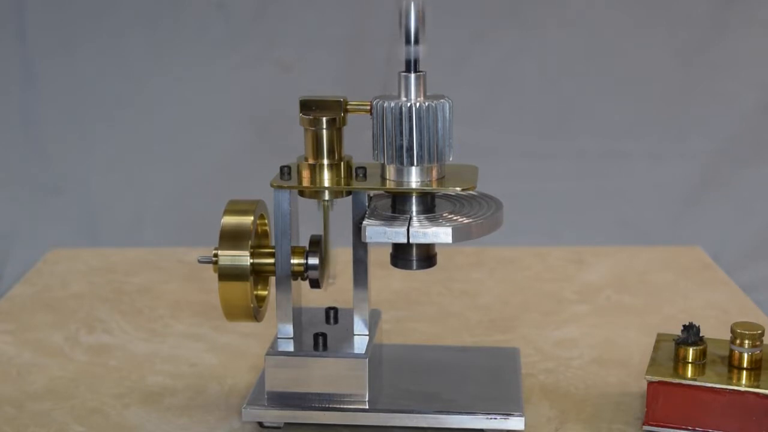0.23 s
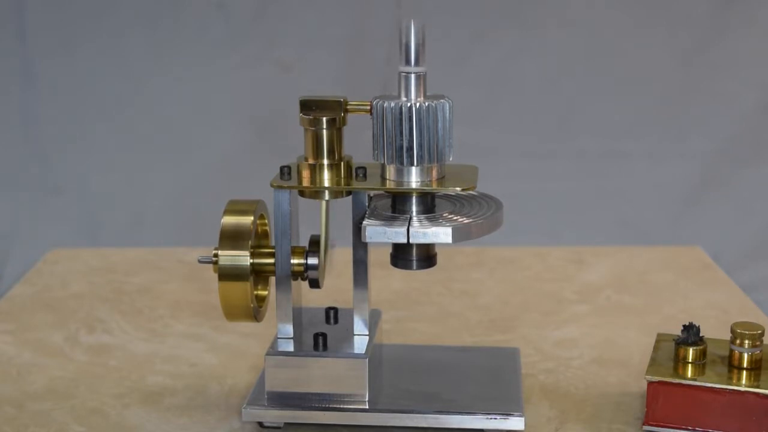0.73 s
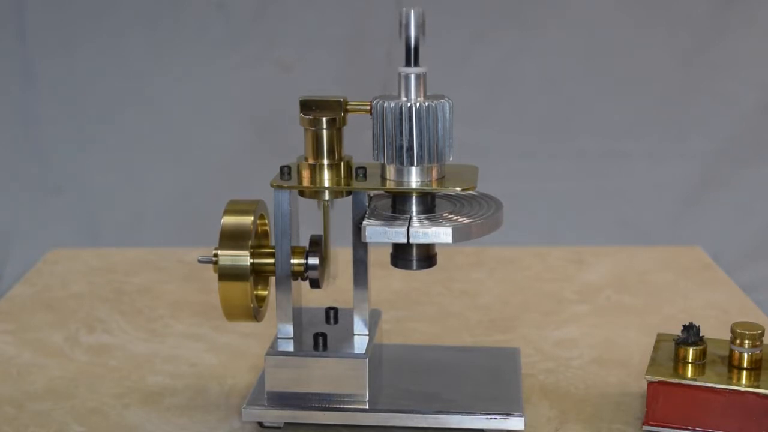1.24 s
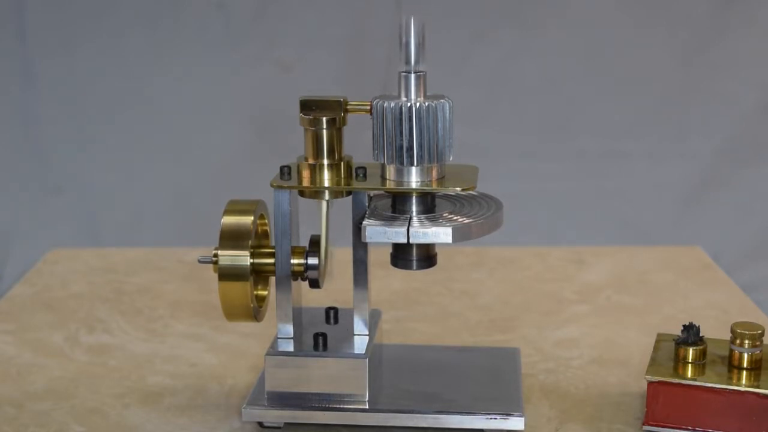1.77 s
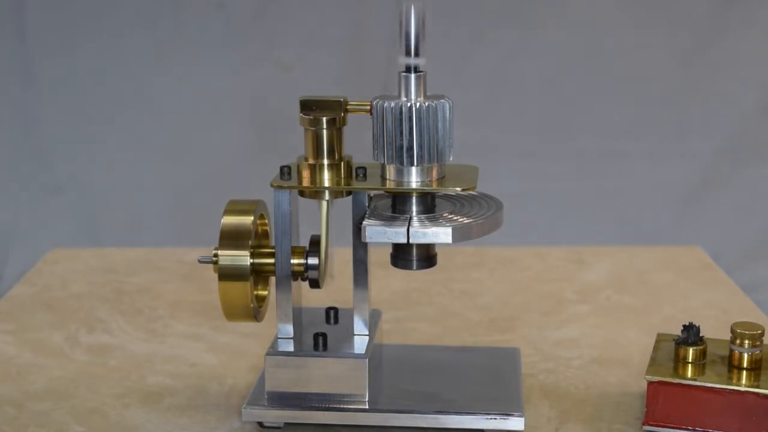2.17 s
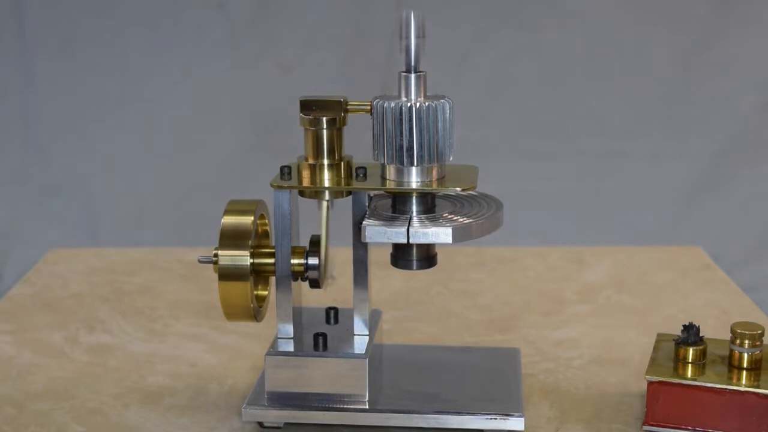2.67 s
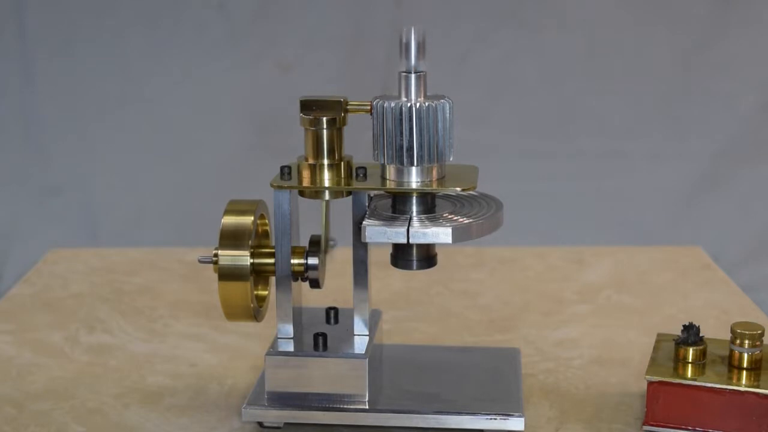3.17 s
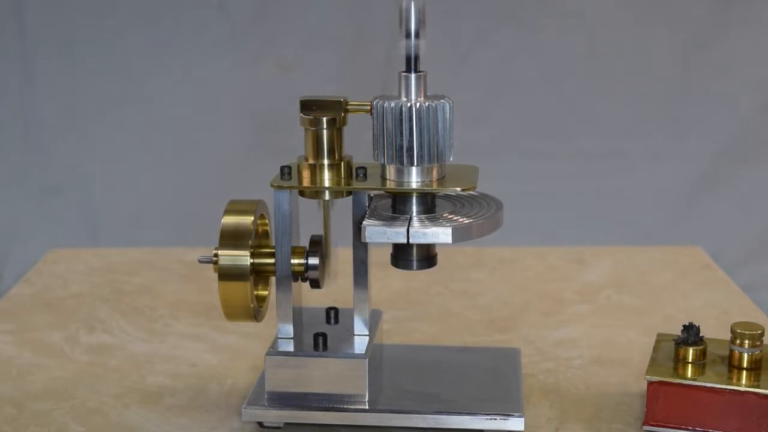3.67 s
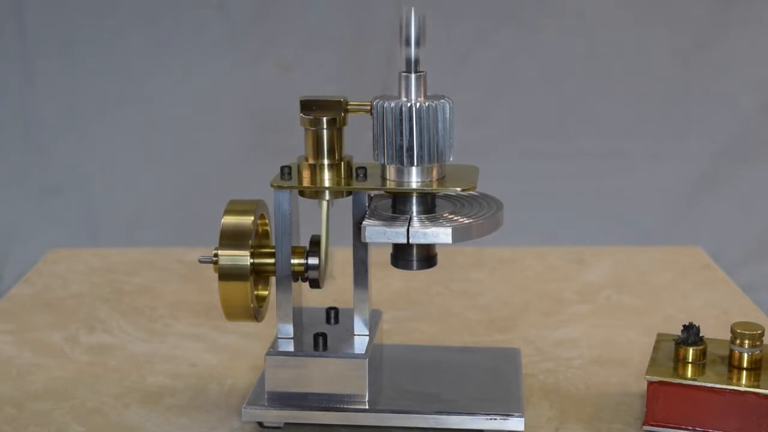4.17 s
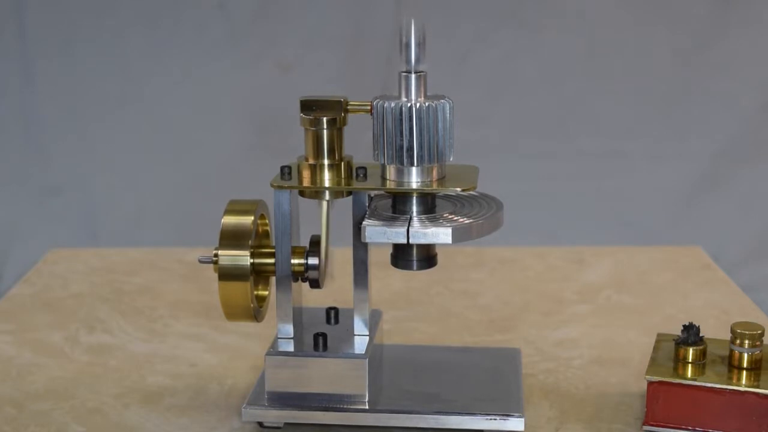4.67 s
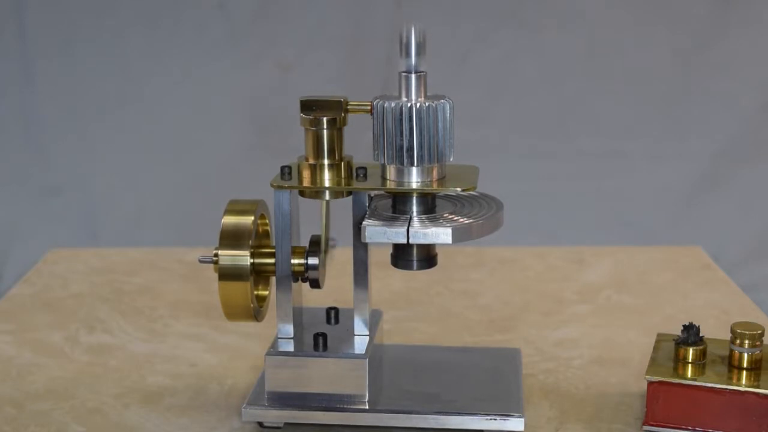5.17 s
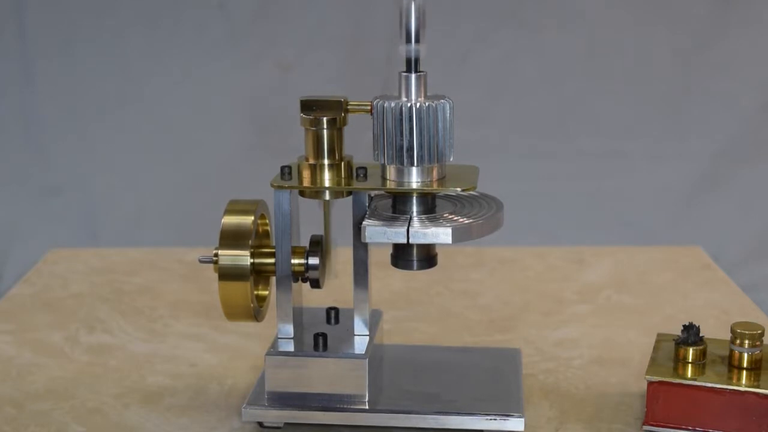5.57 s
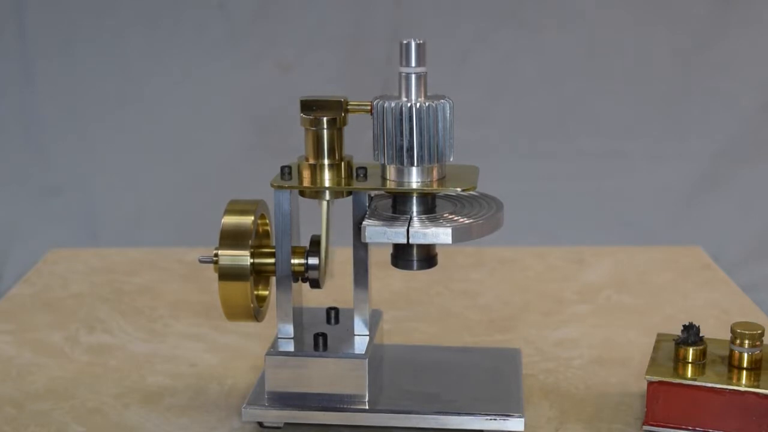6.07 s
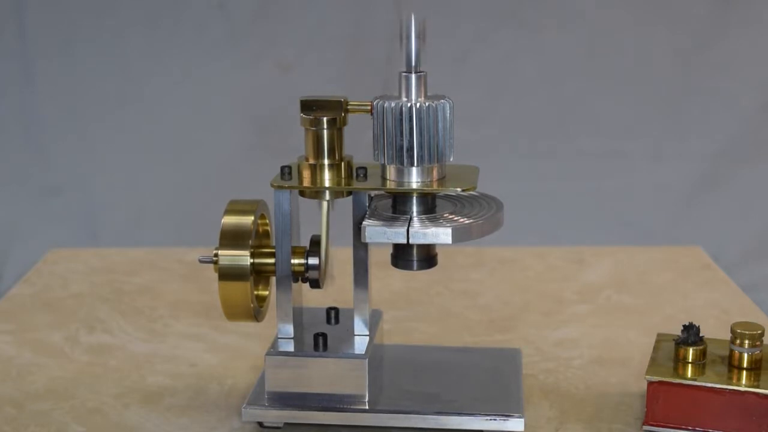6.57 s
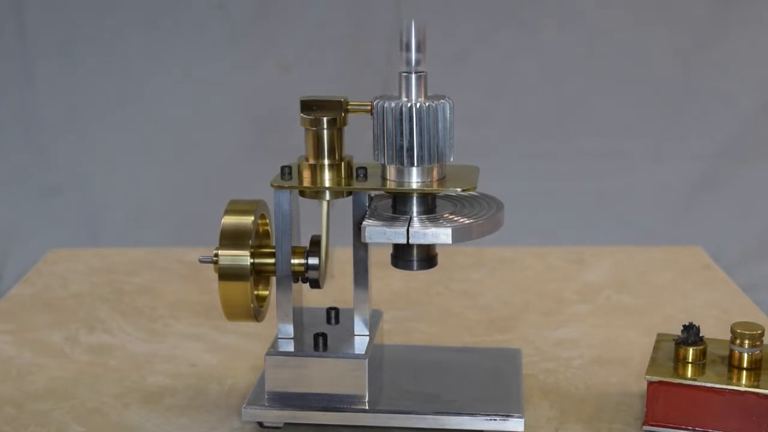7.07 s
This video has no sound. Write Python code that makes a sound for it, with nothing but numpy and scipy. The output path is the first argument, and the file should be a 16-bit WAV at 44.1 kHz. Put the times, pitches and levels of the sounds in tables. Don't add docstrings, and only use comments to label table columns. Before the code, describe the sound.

A small metal hot-air engine runs on a wooden table, its loose piston striking a stop twice each turn: a sharp bright tap, then a duller knock, around twenty pairs a second. The rattle falters several times, leaving short gaps with faint dry ticks, then resumes. Close mono microphone, small room, soft low hum and air noise beneath.

```python
import sys
import numpy as np
from scipy import signal
from scipy.fft import rfft, irfft, next_fast_len
from scipy.io import wavfile

SR = 44100
rng = np.random.default_rng(int(sys.argv[2]) if len(sys.argv) > 2 else 0)


def wrap_up_sound(samples):
    columns = np.atleast_2d(samples).T
    tamed = np.clip(columns, -1, 1)
    steps = np.round(tamed * 32767).astype(np.int16)
    wavfile.write(sys.argv[1], SR, steps)


def undo_db(level):
    steps = np.asarray(level, float) / 20
    return 10 ** steps


N = 322371
RING = SR // 5


def unit(x):
    return x / np.sqrt(np.mean(x ** 2) + 1e-20)


def along(points, hz):
    f, v = np.transpose(points)
    return np.interp(np.log(hz + 1), np.log(f + 1), v)


def filtered(x, response):
    n = x.shape[-1]
    m = next_fast_len(n + 8192)
    return irfft(rfft(x, m) * response(np.fft.rfftfreq(m, 1 / SR)), m)[..., :n]


# (frequency [Hz], density [dB per Hz])
AIR_NOISE = [(25, -47), (60, -8.5), (110, -13.5), (200, -13.5), (300, -16.5), (480, -5), (700, -17),
             (950, -17.5), (2000, -31), (4000, -28), (7000, -35), (10000, -40), (16000, -43)]
# (frequency [Hz], width [Hz], level [dB])
HUM_LINES = [(120.5, 3.1, -53.5), (145.6, 4.8, -52), (161, 6.3, -53.5)]


def room_tone():
    air_db = -44.5
    air = filtered(rng.standard_normal(N), lambda hz: undo_db(along(AIR_NOISE, hz)))
    tone = undo_db(air_db) * unit(air)
    for center_hz, width_hz, db in HUM_LINES:
        line = filtered(rng.standard_normal(N), lambda hz: 1 / (1 + (2 * (hz - center_hz) / width_hz) ** 2))
        tone += undo_db(db) * unit(line)
    return tone


# (first [s], last [s], reach at first [dB], reach at last [dB])
STEADY_SPELLS = [(.0031, .3865, 0, -1), (0.4346, .4352, -5, -4.5), (0.5752, .5755, -6, -6),
                 (0.6232, .8625, -.5, -1.5), (0.9074, 1.103, -0.5, -6), (1.5436, 1.5438, -2.5, -2.5),
                 (1.5923, 1.6961, 0, -1), (1.7525, 1.8032, -6.5, -4), (1.8506, 2.2011, -0.5, 0.5),
                 (2.407, 2.407, -3, -7), (2.4529, 2.9036, .5, .5), (2.951, 3.1944, .5, 0),
                 (3.2472, 3.2475, -4, -5.5), (3.391, 3.3908, -1.5, -1), (3.4367, 3.6796, 1, .5),
                 (3.7265, 4.0152, .5, -1), (4.4032, 4.4515, 0.9, 1), (4.5063, 4.6566, -1, -1),
                 (4.7052, 5.147, 0, 0), (5.1982, 5.3918, -1.8, -0.5), (5.4376, 5.5364, .5, -0.5),
                 (5.5824, 5.965, 0, -0.5), (6.0172, 6.0169, -8, -8), (6.4046, 6.5027, -.5, 1),
                 (6.5536, 6.654, 0.2, .7), (6.708, 6.9055, -0.1, 0.6), (6.957, 7.3041, -0.1, 0.5)]
# (time [s], blow [dB], hardness [dB])
STRAY_TOP = [
    (-.046, -35, -8),
    (1.2446, -30.5, 0.5),
    (3.3345, -29, 1.5),
    (4.102, -27.5, -0.5),
    (4.259, -32, -8),
    (4.3486, -29, 3),
    (6.258, -29, -4),
]
# (time [s], blow [dB])
STRAY_BOTTOM = [(-.021, -15), (.4634, -31.5), (0.5085, -30), (1.133, -36.5), (1.1594, -29), (1.2164, -27),
                (1.271, -29.5), (1.4747, -33), (1.5187, -27), (2.2328, -28), (2.2863, -30), (2.3367, -32.5),
                (2.382, -27), (3.2739, -29), (3.3686, -26), (4.0435, -29.5), (4.1411, -30.5), (4.1916, -34),
                (4.2273, -27), (4.2865, -29), (4.3808, -24.5), (6.045, -34.5), (6.0803, -26.5),
                (6.1652, -29.5), (6.2329, -28.5), (6.2852, -28), (6.3761, -25.5)]


def piston():
    turn_s, down_share = 0.049, 0.535
    top_db, top_hard_db, hard_per_reach = -25.5, 1.4, 0.68
    bottom_db, bottom_hard_db, bottom_reach = -25, -3, 0.53
    top_slop_s, slop_s, soft_db_per_slop = 0.0005, 0.0008, 1.7
    blow_scatter_db, hard_scatter_db = 0.5, 0.65

    spells = []
    for first_s, last_s, first_db, last_db in STEADY_SPELLS:
        count = round((last_s - first_s) / turn_s) + 1
        spells.append(np.linspace((first_s, first_db), (last_s, last_db), count))
    s, reach_db = np.concatenate(spells).T
    chance = rng.standard_normal((len(s), 5))

    top_s = s + top_slop_s * chance[:, 0]
    top_blow_db = top_db + reach_db + blow_scatter_db * chance[:, 1]
    hard_scatter = hard_scatter_db * (chance[:, 2] - chance[:, 1])
    top = np.c_[top_s, top_blow_db, top_hard_db + hard_per_reach * reach_db + hard_scatter]

    gap_s = np.diff(s)
    slop = np.diff(chance[:, 3])
    mean_reach_db = (reach_db[1:] + reach_db[:-1]) / 2
    bottom_s = s[:-1] + down_share * gap_s + slop_s * slop
    bottom_blow_db = bottom_db + bottom_reach * mean_reach_db + blow_scatter_db * chance[1:, 4]
    bottom_hardness_db = bottom_hard_db - soft_db_per_slop * np.maximum(slop, -1)
    bottom = np.c_[bottom_s, bottom_blow_db, bottom_hardness_db]
    bottom = bottom[gap_s < 1.3 * turn_s]
    stray_bottom = [(t, db, bottom_hard_db) for t, db in STRAY_BOTTOM]
    return np.r_[top, STRAY_TOP], np.r_[bottom, stray_bottom]


# (frequency [Hz], gain [dB])
HEARD_GAIN = [(310, 5.5), (400, 3.5), (500, 1), (2400, 1.5), (3200, 0), (3800, 0), (4400, 1.5), (5900, 1.5)]


def modes(table, column, rise_cycles):
    held = 0.91
    hz, t60, swing = np.transpose(table)[[0, 1, column], :, None]
    t = np.arange(RING) / SR
    decay = undo_db(along(HEARD_GAIN, hz) - 60 * t / (held * t60))
    rise = 1 - np.exp(-t * hz / rise_cycles)
    return swing * decay * rise * np.sin(2 * np.pi * hz * t)


def causal(points):
    hz = np.fft.rfftfreq(2048, 1 / SR)
    cepstrum = irfft(np.log(undo_db(along(points, hz))))
    folded = np.r_[cepstrum[0], 2 * cepstrum[1:1024], np.zeros(1024)]
    pulse = irfft(np.exp(rfft(folded)))[:512]
    return pulse / np.abs(pulse).max()


def placed(s, sounds):
    at = np.round(s * SR).astype(int) + np.arange(RING) + RING
    return np.bincount(at.ravel(), sounds.ravel(), N + 2 * RING)[RING:N + RING]


# (frequency [Hz], t60 [s], swing from top blow, swing from bottom blow)
TABLE_MODES = [(298, 0.068, 0.15, -0.85), (397, 0.074, 1.08, -0.6), (467, 0.039, -1.44, 0.26),
               (531, 0.041, -1.18, 0.14), (643, 0.124, -0.16, -0.65), (691, 0.055, 0.61, 1.4),
               (895, 0.042, 0.32, -1.0)]
PLATE_MODES = [(1124, 0.042, 0.87, -1.51), (1224, 0.067, 0.58, -1.15), (1250, 0.045, 2.31, -0.79),
               (1283, 0.105, -0.29, 0.57), (1585, 0.071, 0.24, -0.4), (1649, 0.2, 0.13, -0.15),
               (1756, 0.2, -0.11, 0.15), (1878, 0.011, -0.47, 0.76), (1914, 0.2, -0.12, 0.22),
               (2028, 0.032, -0.57, 2.02), (2194, 0.05, -0.18, 0.37), (2273, 0.2, -0.16, 0.24),
               (2337, 0.034, -0.7, 0.99), (2535, 0.113, -0.21, 0.12)]
FRAME_MODES = [(3077, 0.085, -0.09, -0.21), (3210, 0.003, -6.27, 6.6), (3436, 0.006, 0.61, -2.44),
               (3716, 0.059, 0.63, -0.47), (3802, 0.012, 2.25, -0.48), (3848, 0.2, 0.3, -0.35),
               (3965, 0.118, 0.62, -0.62), (4151, 0.009, 2.6, -5.09), (4174, 0.176, -0.47, 0.76),
               (4249, 0.2, -0.32, 0.62), (4290, 0.086, -0.4, 0.84), (4427, 0.01, -0.31, 2.61),
               (4693, 0.044, 0.18, -0.21), (5035, 0.047, -0.91, 0.38), (5087, 0.007, -2.18, 0.9),
               (5711, 0.061, 0.02, 0.47), (5738, 0.2, -1.03, 0.75), (5785, 0.069, -0.69, 0.2),
               (5916, 0.005, 2.79, -3.75), (6649, 0.089, 0.39, 0.19), (6696, 0.031, 0.95, 0.42),
               (7031, 0.014, 0.37, -0.24), (7473, 0.092, -0.01, 0.19), (7883, 0.046, -0.01, -0.2),
               (8346, 0.014, -0.4, -0.31), (8866, 0.007, -0.41, -0.12), (10810, 0.014, 0.08, 0.21),
               (12056, 0.016, -0.04, -0.04), (15338, 0.02, -0.0, -0.02)]


def taps(events, column, frame_db, fizz, fizz_db, fizz_t60, snap_db, scatter_db):
    s, blow_db, hard_db = np.transpose(events)[:, :, None]
    base = np.r_[modes(TABLE_MODES, column, rise_cycles=1.6), modes(PLATE_MODES, column, rise_cycles=0.1)]
    frame = modes(FRAME_MODES, column, rise_cycles=0.1)
    base_scatter_db = scatter_db * rng.standard_normal((len(s), len(base)))
    frame_scatter_db = scatter_db * rng.standard_normal((len(s), len(frame)))
    ring = undo_db(blow_db + base_scatter_db) @ base
    ring += undo_db(blow_db + hard_db + frame_db + frame_scatter_db) @ frame

    t = np.arange(RING) / SR
    fade = undo_db(fizz_db - 60 * t / fizz_t60) + undo_db(snap_db - 60 * t / 0.013)
    shared = rng.standard_normal(RING)
    fresh = rng.standard_normal((len(s), RING))
    grit = fade * (0.8 * shared + 0.6 * fresh)
    hiss = signal.fftconvolve(grit, causal(fizz)[None], axes=1)[:, :RING]
    ring += undo_db(blow_db + 1.15 * hard_db) * hiss
    return placed(s, ring)


# (frequency [Hz], level [dB])
TOP_FIZZ = [(220, -26.5), (350, 0.5), (850, 4.5), (1500, -11.5), (3000, 0), (4200, -6.5), (5400, 1),
            (7300, -0.5), (9000, -10), (11500, -16.5), (14200, -24.5), (15500, -42.5)]


def top_stop(events):
    return taps(events, column=2, frame_db=1.15, fizz=TOP_FIZZ, fizz_db=-7.5, fizz_t60=0.083,
                snap_db=3, scatter_db=-0.5)


# (frequency [Hz], level [dB])
BOTTOM_FIZZ = [(220, 4.5), (350, -54), (850, -7), (1500, -3.5), (2600, -0.5), (4200, 0), (5300, -4),
               (7300, -1), (9600, -12.5), (10750, -7.5), (11600, -13.5), (14200, -19.5), (14900, -7.5),
               (15700, -13)]


def bottom_stop(events):
    return taps(events, column=3, frame_db=1.5, fizz=BOTTOM_FIZZ, fizz_db=-5.0, fizz_t60=0.1,
                snap_db=2, scatter_db=-0.2)


# (frequency [Hz], t60 [s])
ROOM_DECAY = [(200, 0.11), (1000, 0.21), (4000, 0.29), (10000, 0.24), (16000, 0.041)]


def room(x, count=8):
    hz, t, z = signal.stft(rng.standard_normal((count, SR // 2)), SR, nperseg=256)
    decay = undo_db(-60 * t / along(ROOM_DECAY, hz)[:, None])
    tails = signal.istft(z * decay, SR, nperseg=256)[1]
    slots = np.arange(N) * 20 // SR % count == np.arange(count)[:, None]
    wet = signal.fftconvolve(x * slots, tails / np.linalg.norm(tails[0]), axes=1).sum(0)
    return np.pad(wet, (300, 0))[:N]


# (time [s], peak [dB])
PIN_TICKS = [(0.4628, -38), (0.5262, -36), (0.5462, -41), (1.1283, -37), (1.2944, -43), (1.3414, -24),
             (1.3608, -44), (1.393, -25.5), (1.4264, -50), (1.441, -28), (1.4644, -41), (2.2584, -42),
             (2.3361, -37), (4.2814, -30), (4.3074, -39), (6.0414, -26), (6.1104, -37), (6.2038, -40),
             (6.2724, -30), (6.3074, -41), (6.327, -40), (6.337, -25), (6.3535, -32)]
# (frequency [Hz], t60 [s], swing)
PIN_MODES = [(9400, .004, 0.73), (11900, 0.0025, -0.3), (4660, 0.0056, 0.6), (2360, 0.007, -0.46)]


def crank():
    s, db = np.transpose(PIN_TICKS)[:, :, None]
    pin = modes(PIN_MODES, column=2, rise_cycles=0.71)
    scatter_db = 2.7 * rng.standard_normal((len(s), len(pin)))
    return placed(s, undo_db(db - 3.5 + scatter_db) @ pin)


def no_bass(hz):
    bass_hz = 238
    s = 1j * hz / bass_hz
    return (s * s / (1 + 1.414 * s + s * s)) ** 2


def scene():
    tone = room_tone()
    ups, downs = piston()
    stops = top_stop(ups) + bottom_stop(downs)
    engine = filtered(undo_db(-0.53) * stops + crank(), no_bass)
    return (engine + undo_db(-11.0) * room(engine) + tone)[None]


def roll_off(x):
    return signal.sosfilt(signal.butter(12, 16980, fs=SR, output="sos"), x)


def record(dry):
    x = filtered(dry, lambda hz: 1 / (1 + (hz / 15840) ** 600))
    x = x / (1 + np.abs(x) ** 24) ** (1 / 24)
    x = filtered(x, lambda hz: 1 / (1 + (hz / 16300) ** 40))
    return roll_off(x)


dry = scene()
out = record(dry)
wrap_up_sound(out)
```